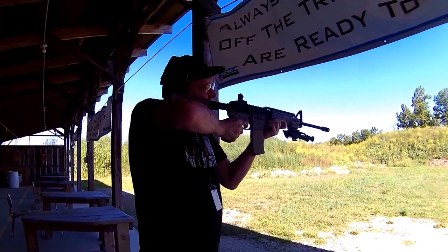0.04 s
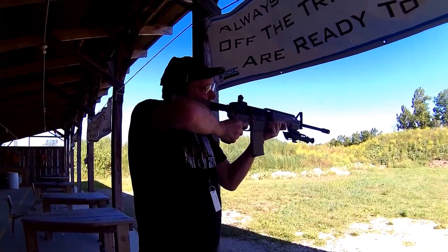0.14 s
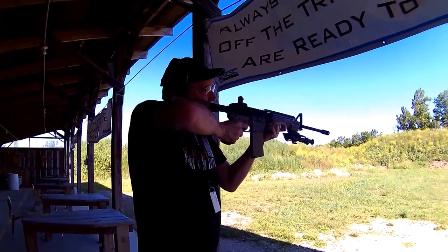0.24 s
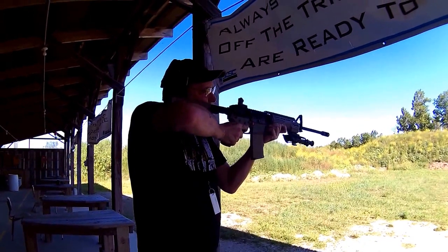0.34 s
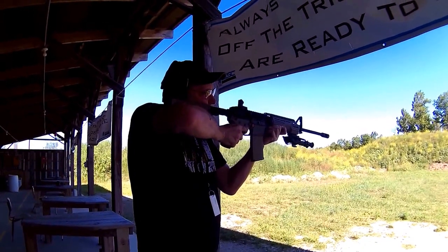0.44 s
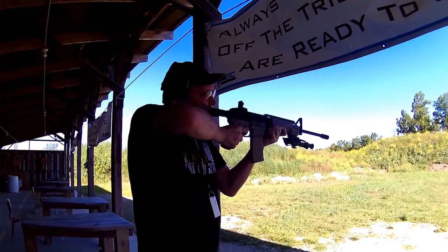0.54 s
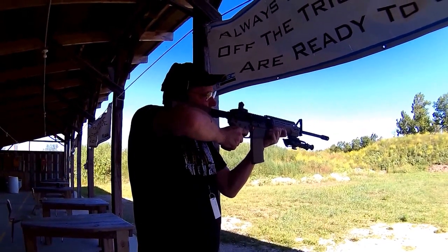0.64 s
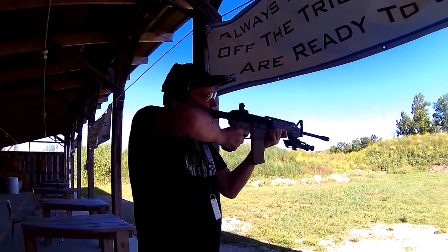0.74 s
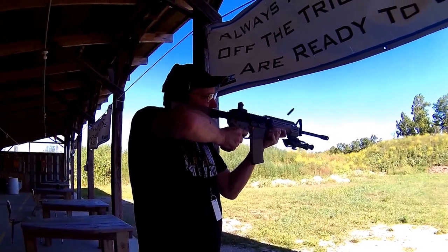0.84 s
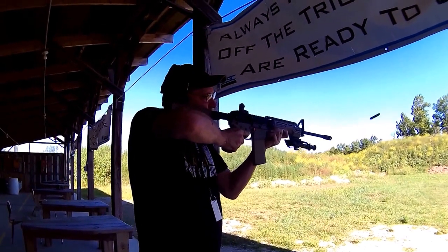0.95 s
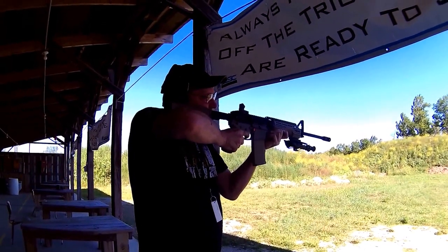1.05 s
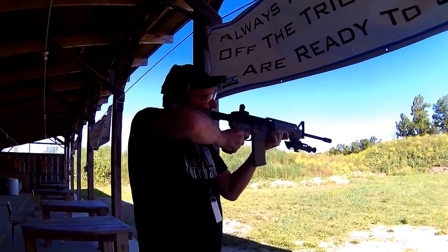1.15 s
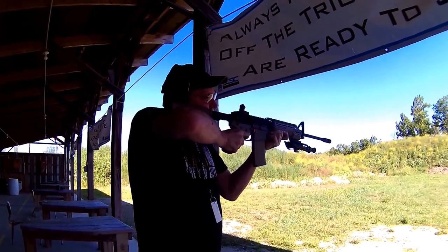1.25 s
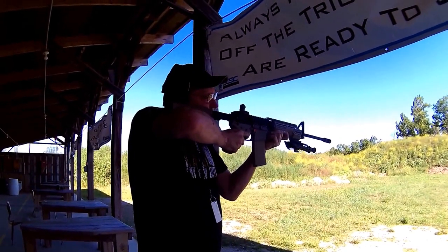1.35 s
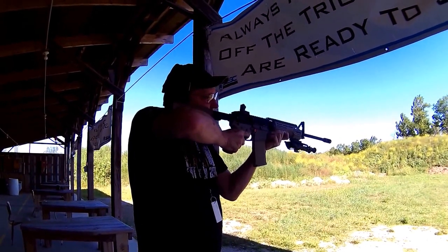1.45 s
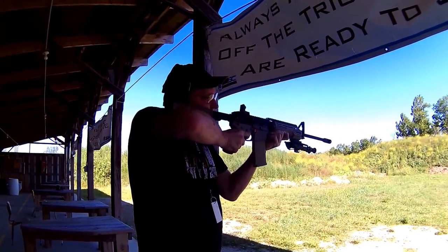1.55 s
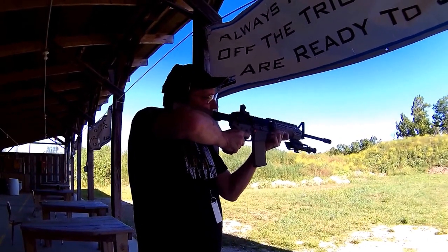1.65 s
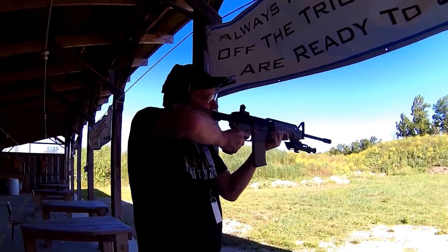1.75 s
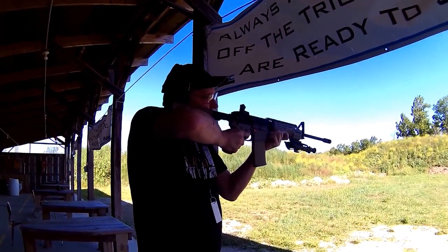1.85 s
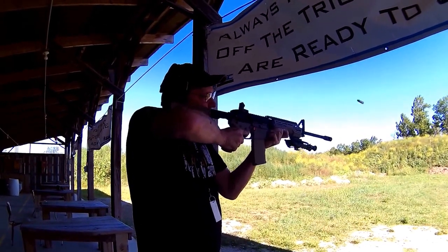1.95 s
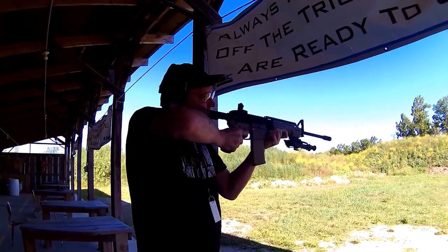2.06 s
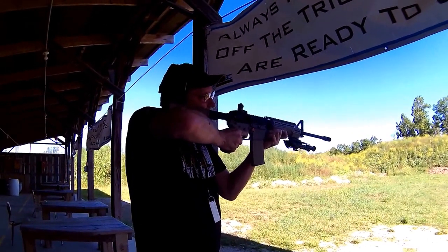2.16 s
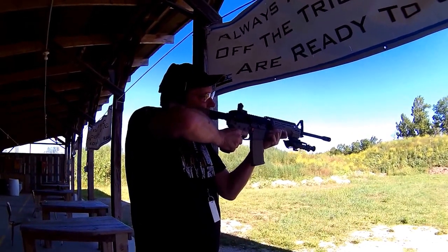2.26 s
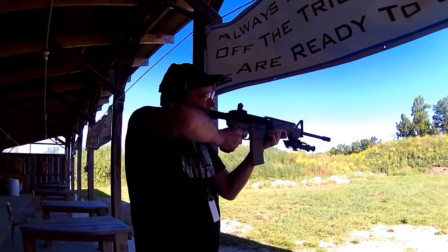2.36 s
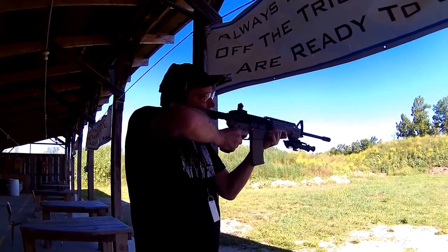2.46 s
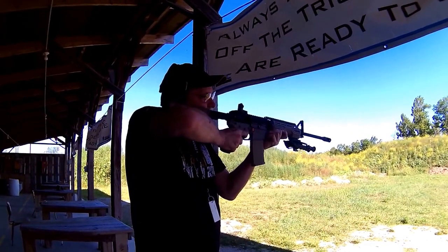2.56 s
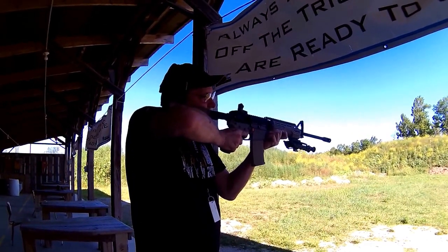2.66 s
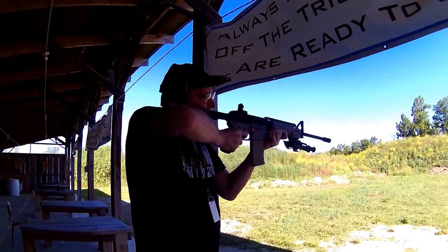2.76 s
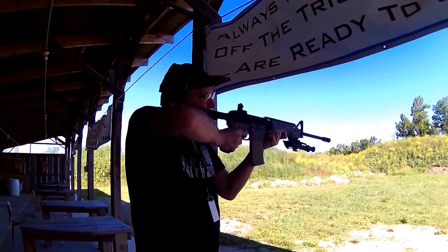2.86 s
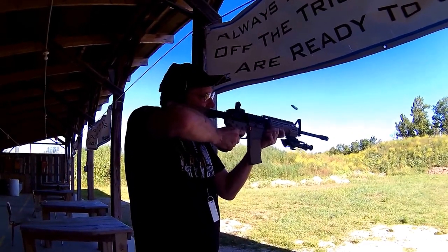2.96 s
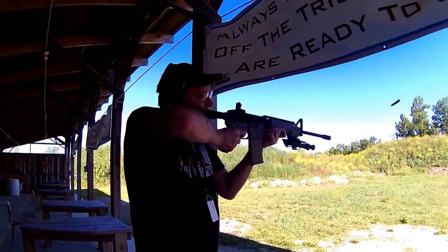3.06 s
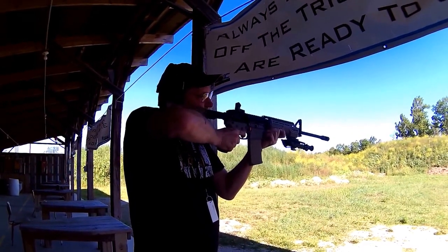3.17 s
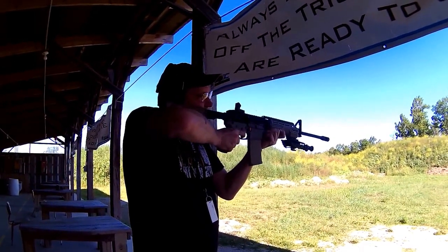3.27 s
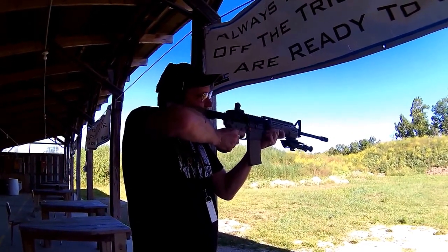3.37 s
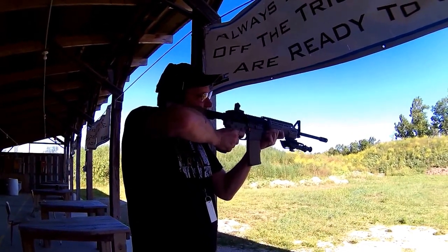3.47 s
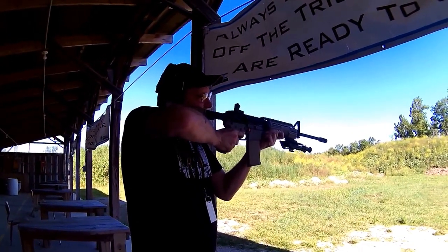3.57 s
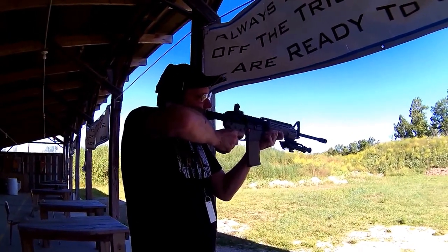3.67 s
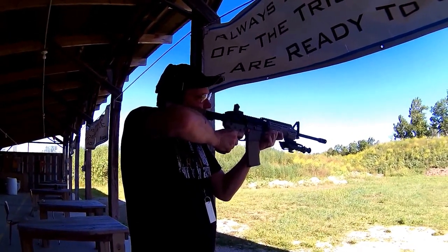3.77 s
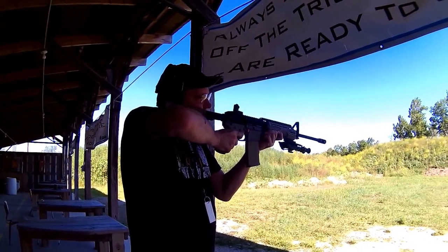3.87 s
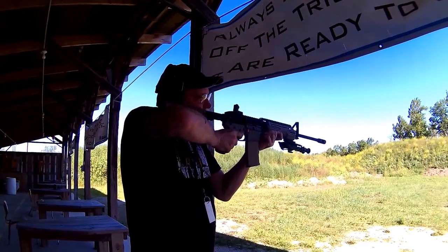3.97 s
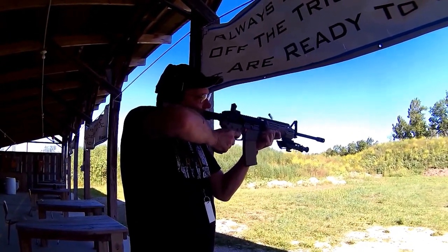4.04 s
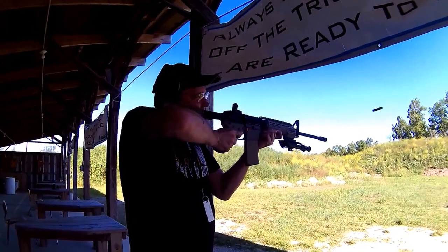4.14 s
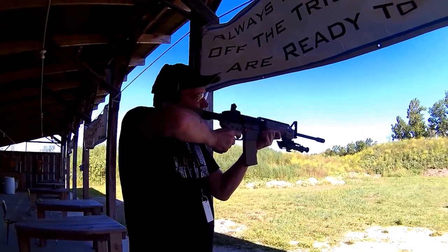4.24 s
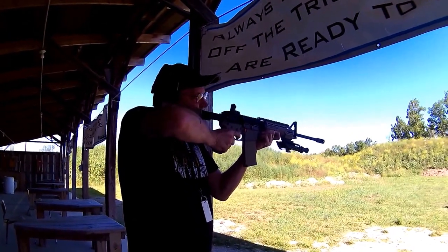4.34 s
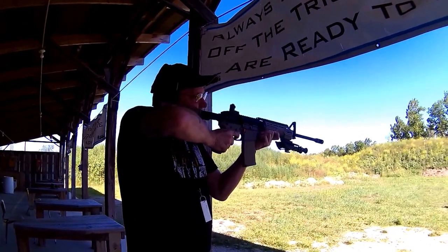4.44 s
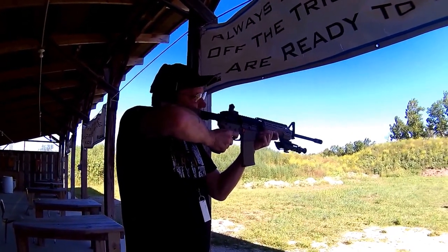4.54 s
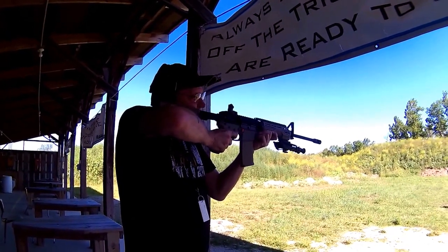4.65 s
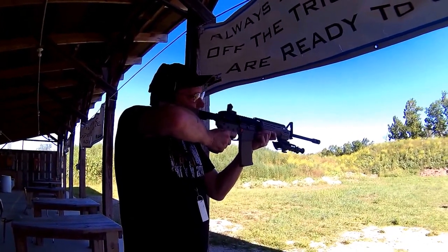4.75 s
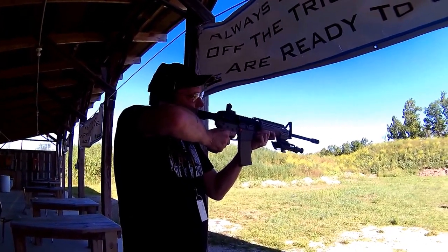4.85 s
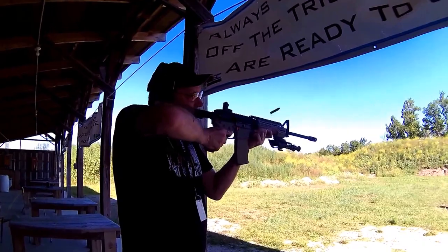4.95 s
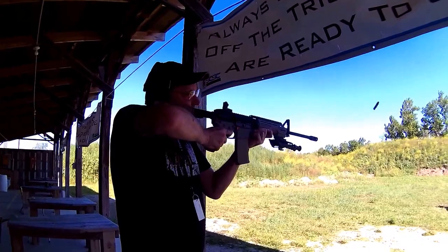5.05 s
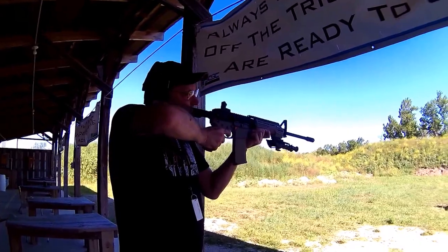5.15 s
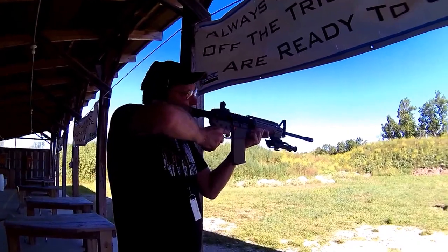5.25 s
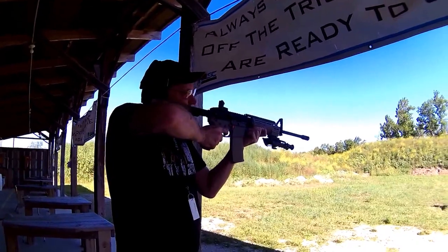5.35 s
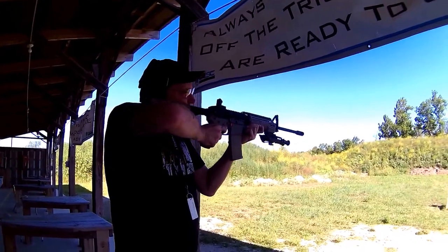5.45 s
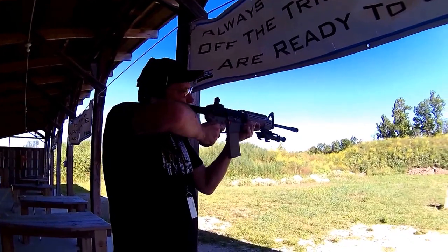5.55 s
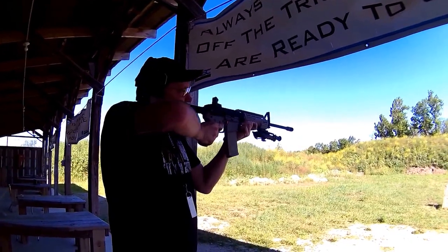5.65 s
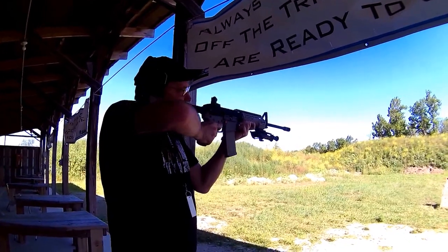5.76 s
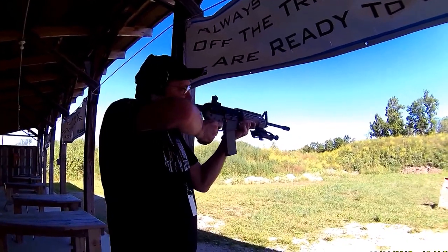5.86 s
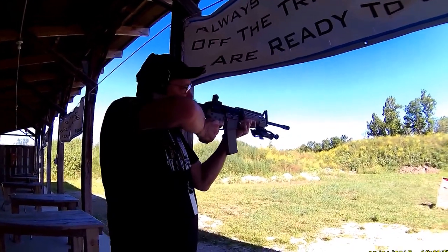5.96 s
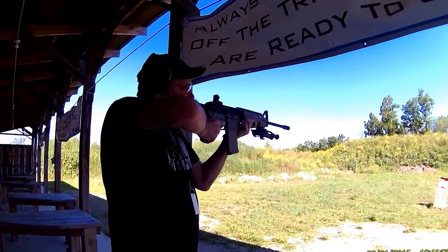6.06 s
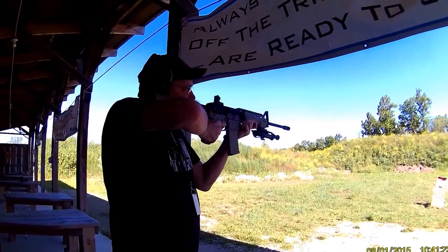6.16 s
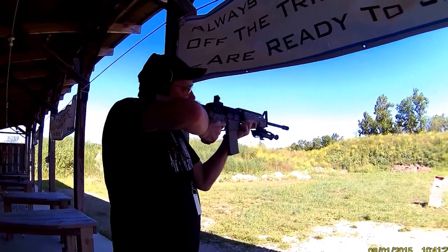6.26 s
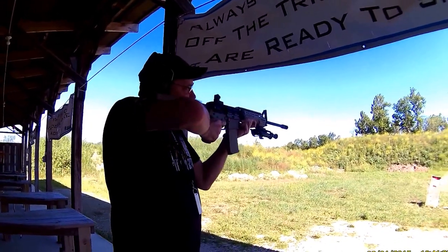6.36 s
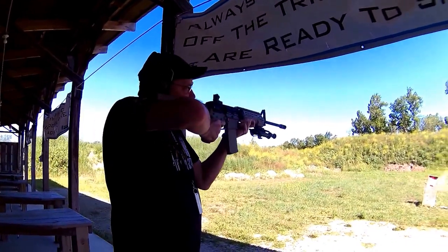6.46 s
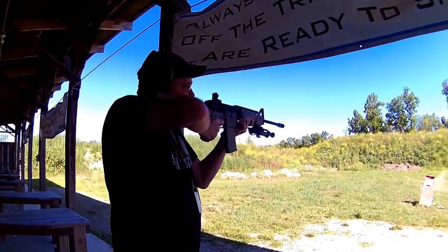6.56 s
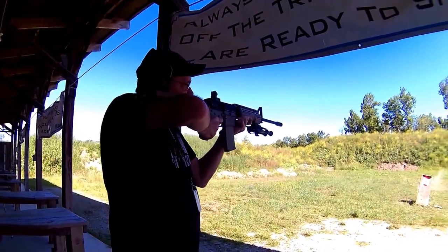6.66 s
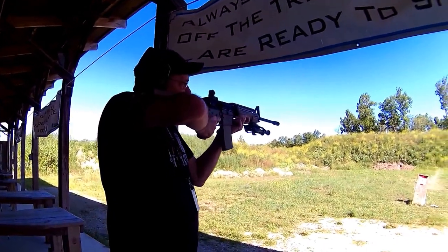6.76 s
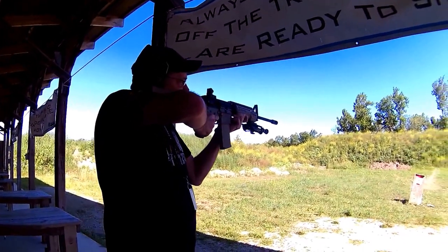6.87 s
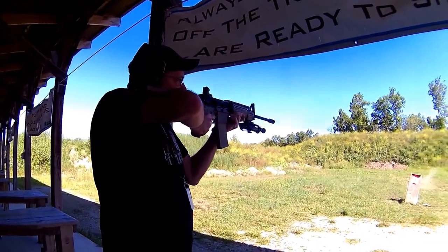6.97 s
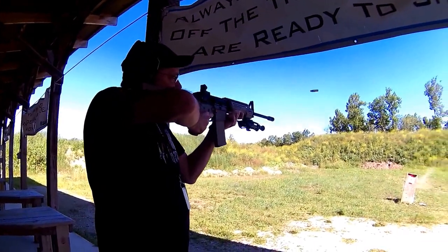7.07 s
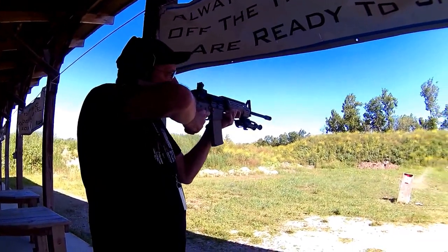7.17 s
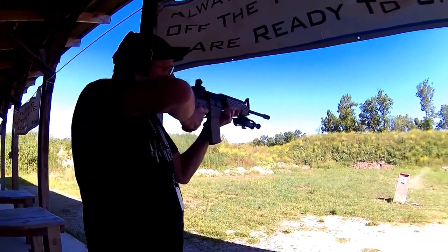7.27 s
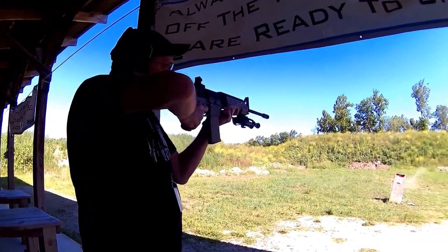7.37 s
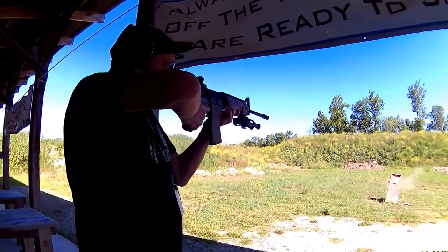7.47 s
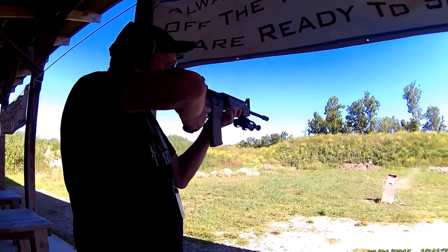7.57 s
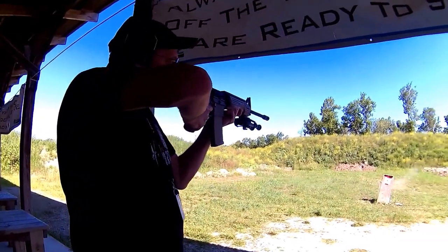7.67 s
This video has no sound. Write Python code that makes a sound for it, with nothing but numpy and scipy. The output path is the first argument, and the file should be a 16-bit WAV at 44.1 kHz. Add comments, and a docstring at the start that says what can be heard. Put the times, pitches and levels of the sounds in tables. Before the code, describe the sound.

Outdoor range under a covered firing line. Close to the microphone, a rifle fires six single shots about a second apart, with a longer pause before the last. Each begins with a tiny metallic click and a clipped crack, then a dense echo that dulls as it fades. Bullets thump downrange and brass cases ring high on concrete. Light wind lies faintly behind.

```python
"""Rifle fire under a roof

A rifle fires six single shots at an outdoor firing line; each blast overloads the microphone.
Noise under a falling, dulling spectrum makes the echoes from roof, banks and trees. Bullets thud
downrange as shaped noise bursts; spent brass cases ring on concrete as dying modes, among small ticks.
Two bird chirps, faint wind and a thin electrical whine, made of tones and noise, lie behind."""
import sys
import numpy as np
from scipy import signal
from scipy.io import wavfile
from scipy.ndimage import uniform_filter1d

SR = 44100
rng = np.random.default_rng(int(sys.argv[2]) if len(sys.argv) > 2 else 0)


def waveform_to_disk(signal):
    """Save audio, clipped to [-1, 1], as 16-bit WAV at the path in sys.argv[1]."""
    frames = np.transpose(np.atleast_2d(signal))
    scaled = np.clip(frames, -1, 1) * 32767
    samples = np.round(scaled).astype(np.int16)
    wavfile.write(sys.argv[1], SR, samples)


def gain_from_db(level_db):
    """Turn a decibel level (scalar or array-like) into a linear amplitude factor."""
    decades = np.asarray(level_db, float) / 20
    return 10 ** decades


N = 340126  # samples
SIZE, HOP = 1024, 256  # short-time spectra, samples
BINS_HZ = np.fft.rfftfreq(SIZE, 1 / SR)
FRAMES_S = np.arange(N // HOP + 5) * HOP / SR

# The six shots: [blast t/s, level control takes hold t/s, hammer level ahead of mode offsets/dB]
SHOTS = [(.7282, .8513, -16), (1.8103, 1.8444, -16), (2.8704, 2.9363, -15), (3.9619, 3.9896, -15),
         (4.8509, 4.8914, -15), (6.8866, 6.9746, -19)]
EARLIER_SHOT_S = -0.306  # only its echoes fall inside the scene
BLASTS_S = np.array([EARLIER_SHOT_S] + [shot[0] for shot in SHOTS])
HAMMER_LEAD_S = .0081


def add(mix, s, sound):
    """Superposition: adds a sound to the mix from time s on."""
    part = mix[round(s * SR):][:len(sound)]
    part += sound[:len(part)]


def ring(hz, db, t60):
    """Free decay of one mode: a sine that loses 60 dB in t60 seconds."""
    t = np.arange(SR // 2) / SR
    return gain_from_db(db - 60 * t / t60) * np.sin(2 * np.pi * hz * t)


def puff(db, t60, low_hz, top_hz):
    """Exponential decay of broadband noise, then band-pass filtered; db is the level ahead of the filter."""
    t = np.arange(SR // 4) / SR
    decaying = gain_from_db(db - 60 * t / t60) * rng.standard_normal(len(t))
    band = signal.butter(3, np.clip([low_hz, top_hz], 50, 20000), "bandpass", fs=SR, output="sos")
    return signal.sosfilt(band, decaying)


def white(at=slice(None)):
    """Equal mean power at all frequencies: short-time spectra of white noise read at the given samples."""
    x = rng.standard_normal((len(FRAMES_S) - 1) * HOP)[at]
    return signal.stft(x, nperseg=SIZE, noverlap=SIZE - HOP)[2].T


def noise(field_db, low_hz, top_hz, spectra):
    """Time-varying filtering: weights white spectra by a dB field, scaled to rms 1 from low_hz to top_hz."""
    band = (BINS_HZ >= low_hz) & (BINS_HZ < top_hz)
    gain = gain_from_db(field_db)
    band_rms = np.sqrt((gain[:, band] ** 2).sum(1, keepdims=True) * 2 / SIZE)
    gain = gain / band_rms
    return signal.istft((spectra * gain).T, nperseg=SIZE, noverlap=SIZE - HOP)[1][:N]


def log_interp(hz, values):
    """Constant-ratio frequency scale: interpolates values over log frequency onto the spectral bins."""
    return np.interp(np.log(BINS_HZ + 1), np.log(hz), values)


def muzzle():
    """Impulsive radiation: the direct crack is a bright noise burst that falls 60 dB in 26 ms."""
    out = np.zeros(N)
    for s, *_ in SHOTS:
        add(out, s + .0006, puff(19, 0.026, 2000, 15000))
    return out


def controls(t):
    """Echo decay: time since the last blast, and level, treble and bass of the echo field at that age."""
    # Blast and near echoes, alike for every shot:
    # [after blast t/s, 500-2500 Hz level/dB, treble control/dB, bass control/dB]
    near = [(0, -11, -1, -12.5), (.0012, 24.5, -10.5, -16), (.03, 18.5, -16, -2), (0.119, 10.5, -16.5, -4),
            (.185, -0.5, -18, -8), (.225, -8, -14, -5), (.252, -17.5, -9.5, -8),
            (0.267, -19.5, -9.5, -10.5), (.277, -14, -10.5, -7.5)]
    # Far echoes from banks and trees, same columns:
    # [after blast t/s, 500-2500 Hz level/dB, treble control/dB, bass control/dB]
    far = [(.292, -23.5, -9.5, -9.5), (.31, -25.5, -7.5, -15.5), (.39, -25.5, -11, -20),
           (.425, -28.5, -13.5, -12), (.445, -26.5, -9.5, -15.5), (.54, -27, -10.5, -14),
           (.63, -30.5, -12, -14.5), (.675, -29.5, -12, -11), (.72, -34, -12.5, -17),
           (.78, -36.5, -14.5, -16), (.86, -37.5, -15.5, -15), (.96, -39, -17.5, -17.5),
           (1.0, -43, -15, -11.5), (1.1, -43.5, -16.5, -7), (1.24, -48.5, -22, -8), (1.4, -52, -26, -12),
           (1.62, -55.5, -12, -10), (2.0, -74, -14, -8)]
    flight = t - BLASTS_S[np.searchsorted(BLASTS_S, t, side="right") - 1]
    age, *columns = np.transpose(sorted(near + far))
    return flight, *(np.interp(flight, age, c) for c in columns)


def reflections(flight):
    """Coherence loss: the same surroundings repeat one echo pattern, which moving air scrambles with travel."""
    alike_cycles = 600  # cycles of travel after which the shared amplitude is down to 1/e
    new_aim_s = 6.5  # from here on, another pattern
    t = np.arange((len(FRAMES_S) - 1) * HOP) / SR
    pattern_s = controls(t)[0] + 2 * (t > new_aim_s)
    at = np.round(pattern_s * SR).astype(int)
    alike = np.exp(-(np.outer(flight, BINS_HZ) / alike_cycles) ** 2)
    return alike * white(at) + np.sqrt(1 - alike ** 2) * white()


def gunfire(patchy_db=1.5, grain_db=0.43):
    """Dense multiple reflection: blast echoes as noise, dulled by air and leaves with longer travel."""
    # Colour of the echoes:
    # [f/Hz, relative density/dB per Hz, treble control share, bass control share, level change/dB per s of travel]
    colour = [(40, -6.5, 0.091, -0.35, -28.5), (159, -1.5, 0.18, -0.13, -17.5), (342, 5.5, 0, 0.9, -7),
              (472, 8, 0.17, 0.78, 3), (800, 7, 0, 0.61, 5.5), (1630, 2, 0, -0.038, -4),
              (2004, -2.5, 0.27, -0.16, 1), (3580, -4.5, 0.85, 0.15, -0.5), (3950, 2.5, 0.79, 0.21, -3),
              (4870, -4.5, 0.93, 0.025, -4.5), (6780, -7.5, 0.89, -0.12, -15),
              (7900, -15.5, 0.98, -0.26, -20.5), (12100, -14.5, .8, 0, -36),
              (13000, -18.5, .8, -0.049, -35), (16000, -32, 0.99, 0.62, -36)]
    flight, _, treble_db, bass_db = controls(FRAMES_S)
    hz, *columns = np.transpose(colour)
    base_db, treble_share, bass_share, loss = (log_interp(hz, c) for c in columns)
    field_db = base_db + np.outer(flight, loss)
    field_db += np.outer(treble_db, treble_share) + np.outer(bass_db, bass_share)
    patches = uniform_filter1d(rng.standard_normal(field_db.shape), size=8, axis=0)
    patches = uniform_filter1d(patches, size=12, axis=1)
    field_db += patchy_db * patches / patches.std()
    grain = uniform_filter1d(rng.standard_normal(N), size=90)  # single reflections stand out for a few ms
    level_db = controls(np.arange(N) / SR)[1] + grain_db * grain / grain.std()
    return gain_from_db(level_db) * noise(field_db, 500, 2500, reflections(flight))


def slap():
    """Discrete echo: one far wall answers every blast with a dull short tone trailed by scatter."""
    delay_s, tone_db, tone_hz, t60_s = .8722, -20, 1201.5, .007
    scatter_db = -22
    out = np.zeros(N)
    for s in BLASTS_S + delay_s:
        add(out, s, ring(tone_hz, tone_db, t60_s))
        add(out, s, puff(scatter_db, .04, 700, 2500))
    return out


def impacts(treble_hz=2800, dulling_db_per_s=15):
    """Impact and echo: bullets strike downrange as bass-poor bursts that swell fast, roll off and dull."""
    # Strikes: [t/s, level of the exponential at onset/dB, treble at onset/dB, fall/dB per s]
    strikes = [(.05, -32, -0.5, 63), (1.037, -18, -1, 52.5), (2.252, -21, -3, 120), (3.36, -29.5, -0.5, 61),
               (4.241, -9.5, 2.5, 103), (7.114, -26, 9, 120), (7.312, -30, -5.5, 150)]
    # The burst itself and its two returns: [later t/s, level/dB]
    returns = [(0, 0), (.155, -13.5), (.37, -23)]
    # Spectrum ahead of the treble change: [f/Hz, relative density/dB per Hz]
    colour = [(100, -39), (400, -18.5), (800, -3.5), (1500, 6), (2200, -3.5), (3200, -12), (4200, -8.5),
              (7000, -19.5), (9000, -29), (12000, -32.5), (14000, -41.5), (16000, -49)]
    rise_s = 0.0088
    t, level = np.arange(N) / SR, np.zeros(N)
    for s, db, _, fall in strikes:
        for later, back_db in returns:
            since = np.maximum(t - s - later, 0)
            swell = np.minimum(since / rise_s, 1)
            level = np.hypot(level, swell * gain_from_db(db + back_db - fall * since))
    s, _, treble_db, _ = np.transpose(strikes)
    latest = np.maximum(np.searchsorted(s, FRAMES_S + 0.036) - 1, 0)  # treble is set 36 ms ahead of a strike
    treble_db = treble_db[latest] - dulling_db_per_s * np.maximum(FRAMES_S - s[latest], 0)
    field_db = log_interp(*np.transpose(colour)) + np.outer(treble_db, BINS_HZ > treble_hz)
    return level * noise(field_db, 500, 2500, white())


def hammer():
    """Modal excitation: the hammer falls on the pin just before each blast with short rings and a rattle."""
    # Modes: [nominal f/Hz, level offset/dB, t60/s]
    modes = [(1508, -5, 0.016), (4530, 0, 0.0083), (5260, -3.5, 0.02), (11400, -9.5, 0.015)]
    out = np.zeros(N)
    for s, _, db in SHOTS:
        click = sum(ring(hz * rng.uniform(0.85, 1.03), db + mode_db - 0.5, t60) for hz, mode_db, t60 in modes)
        onset = np.minimum(np.arange(len(click)) / 25, 1)
        add(out, s - HAMMER_LEAD_S, click * onset)
        add(out, s - HAMMER_LEAD_S, puff(db - 11, .03, 1200, 16000))
    return out


def cases(tumble_db=5.5):
    """Mode splitting: a tick, two split rings that waver as the tube tumbles, and a wash from under the roof."""
    # Landings and bounces; levels are ahead of tick filtering and ring partial offsets:
    # [t/s, tick level/dB, lower ring f/Hz, upper ring f/Hz, lower ring level/dB, upper ring level/dB]
    landings = [(0.403, -11, 10710, 14990, -38.5, -25), (.4165, -28, 10700, 14750, -52, -39.5),
                (.456, -38, 10710, 15000, -65.5, -43), (.9, -54, 10750, 15050, -56.5, -42),
                (1.147, -50, 10750, 15100, -60, -55), (1.3952, -31, 10600, 15050, -38, -35.5),
                (1.409, -21, 10900, 14950, -43.5, -41), (1.74, -37.5, 10720, 15120, -36.5, -40),
                (2.5475, -34, 10740, 15160, -44, -39), (2.7456, -58, 10800, 15350, -65.5, -57),
                (3.614, -28, 10900, 15200, -37.5, -39), (3.627, -38, 10650, 14900, -43.5, -44),
                (4.6794, -34.5, 10740, 15300, -30.5, -47), (5.215, -50, 10800, 15100, -52, -57),
                (5.5475, -17, 10610, 15100, -37.5, -24.5), (5.5575, -17.5, 10610, 15180, -35, -30),
                (5.5612, -29, 10610, 15200, -42, -36), (7.65, -36, 10850, 14900, -59, -50)]
    # Three partials of the lower ring, then of the upper: [level offset/dB, t60/s]
    partials = [(-9, 0.15), (-3, 0.25), (-15, .2), (-8.5, .17), (-6.5, .2), (-16.5, .32)]
    # How far each partial lies from its ring: [f offset/Hz]
    split_hz = [-25, 20, 75, -80, 110, -10]
    out = np.zeros(N)
    for s, tick_db, low_hz, high_hz, low_db, high_db in landings:
        partial_hz = np.repeat([low_hz, high_hz], 3) + split_hz
        ring_db = np.repeat([low_db, high_db], 3)
        for hz, db, (mode_db, t60) in zip(partial_hz, ring_db, partials):
            tumble = uniform_filter1d(rng.standard_normal(SR // 2), size=500)
            waver = gain_from_db(2.5 + tumble_db * tumble / tumble.std())
            add(out, s, ring(hz, db + mode_db, t60) * waver)
        tick = puff(tick_db, 0.0031, 5000, 16500)
        wash = puff(tick_db - 22.5, .16, 3500, 17000)
        add(out, s, tick + wash)
    return out


def knocks():
    """Heavily damped impact: small sharp ticks of band noise with no ring."""
    # Ticks: [t/s, level ahead of filtering/dB, low f/Hz, top f/Hz, t60/s]
    ticks = [(1.739, -25.5, 1800, 7000, .012), (4.265, -13, 4970, 13000, 0.033),
             (6.449, -49, 700, 4500, .03), (7.114, -9, 4800, 11000, .015)]
    out = np.zeros(N)
    for s, db, low_hz, top_hz, t60 in ticks:
        add(out, s, puff(db, t60, low_hz, top_hz))
    return out


def bird(blur=.2):
    """Frequency modulation: a far bird's two rising chirps, blurred by a random walk of phase."""
    # Chirps: [t/s, length/s, peak level/dB, from f/Hz, to f/Hz]
    chirps = [(6.05, 0.065, -62.5, 5900, 6700), (6.135, .04, -60.5, 4000, 4300)]
    out = np.zeros(N)
    for s, length, db, from_hz, to_hz in chirps:
        phase = 2 * np.pi * np.cumsum(np.linspace(from_hz, to_hz, round(length * SR))) / SR
        wander = np.cumsum(rng.standard_normal(len(phase)))
        phase += blur * wander * (from_hz / 6000) ** 3  # the high call is the buzzier
        add(out, s, gain_from_db(db) * np.hanning(len(phase)) * np.sin(phase))
    return out


def air(lumpy_db=2.0, gust_hz=300):
    """Turbulence noise: light wind that gusts only in the bass, over a steady distant wash."""
    # Wind and wash: [f/Hz, relative density/dB per Hz]
    colour = [(25, -0.5), (65, 2), (130, -2), (200, -8), (400, -16.5), (700, -10), (1100, -17.5),
              (1900, -24), (2800, -34.5), (4000, -32), (7000, -34), (8500, -38), (15500, -37)]
    bass_db = -52  # mean rms level from 25 to 300 Hz
    gusts = uniform_filter1d(rng.standard_normal(len(FRAMES_S)), size=24)
    gusts_db = lumpy_db * gusts / gusts.std()
    # the level below swings all bins; taking the gusts out above gust_hz keeps the wash steady
    field_db = log_interp(*np.transpose(colour)) - np.outer(gusts_db, BINS_HZ > gust_hz)
    level_db = bass_db + np.interp(np.arange(N) / SR, FRAMES_S, gusts_db)
    return gain_from_db(level_db) * noise(field_db, 25, 300, white())


def whine():
    """Phase diffusion: a faint electrical whine of close tones whose shared phase wavers slightly."""
    # Tones: [f/Hz, rms level/dB]
    tones = [(9905, -85.5), (9981, -72), (10018, -80), (10056, -76), (10137, -86)]
    t = np.arange(N) / SR
    drift = .012 * np.cumsum(rng.standard_normal(N))
    return sum(np.sqrt(2) * gain_from_db(db) * np.sin(2 * np.pi * hz * t + drift) for hz, db in tones)


def scene():
    """Linear superposition: all sources add at one microphone."""
    shots = muzzle() + gunfire() + slap() + hammer()
    strikes = impacts() + cases() + knocks()
    background = bird() + air() + whine()
    return (shots + strikes + background)[None]


def roll_off(x):
    """The treble ends steeply here."""
    return signal.sosfilt(signal.butter(12, 16860, fs=SR, output="sos"), x)


def record(dry, ceiling_db=-3.5, hold_db=-14.5, edge_hz=15750):
    """Overload and gain control: the input stage flattens peaks; a lagging level control caps the rms."""
    clipped = np.clip(dry[0], -gain_from_db(ceiling_db), gain_from_db(ceiling_db))
    rms = np.sqrt(abs(uniform_filter1d(clipped ** 2, size=1200)) + 1e-12)
    gain = np.minimum(gain_from_db(hold_db) / rms, 1)
    for s, held_s, _ in SHOTS:
        gain[round((s - .03) * SR):round(held_s * SR)] = 1  # full gain until the control takes hold
    band_limit = signal.firwin(255, edge_hz, window=("kaiser", 7), fs=SR)
    mix = signal.oaconvolve(clipped * gain, band_limit, "same")[None]
    return roll_off(mix)


dry = scene()
out = record(dry)
waveform_to_disk(out)
```